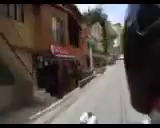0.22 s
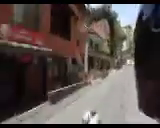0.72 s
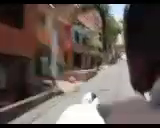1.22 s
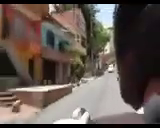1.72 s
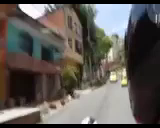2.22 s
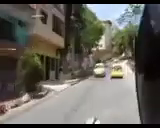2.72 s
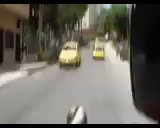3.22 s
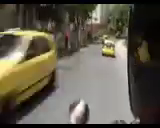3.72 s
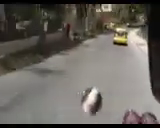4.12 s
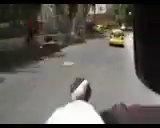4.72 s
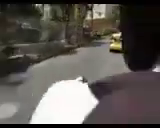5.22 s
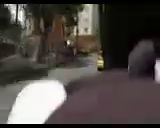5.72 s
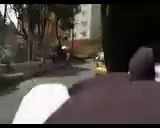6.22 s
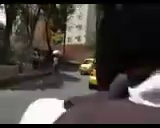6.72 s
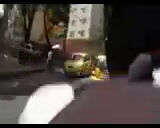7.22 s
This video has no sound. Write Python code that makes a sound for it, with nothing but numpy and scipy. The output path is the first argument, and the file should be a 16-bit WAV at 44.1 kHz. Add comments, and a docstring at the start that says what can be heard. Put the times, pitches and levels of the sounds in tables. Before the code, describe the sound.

Harsh wind buffeting distorts over a single-cylinder motorcycle ride; the gusts ease, the engine emerges, a sharp hiss bursts, and the revs drop.

```python
"""Small motorcycle in gusty wind

A small motorcycle rides down a street with a bare microphone behind the rider's helmet.
Gusts are shaped noise that thumps and crackles; short pushes and spikes overload the microphone.
Beneath them the single-cylinder engine booms in sine waves and clatters in ringing noise, and
slows at the end. Partway through the slowing comes one sharp burst of hiss."""
import sys
import numpy as np
from scipy import signal
from scipy.fft import rfft, irfft
from scipy.io import wavfile
from scipy.ndimage import uniform_filter1d

SR = 44100
rng = np.random.default_rng(int(sys.argv[2]) if len(sys.argv) > 2 else 0)


def to_wav(s):
    """Save 16-bit WAV."""
    ch = np.atleast_2d(s).T  # columns
    pcm = np.round(np.clip(ch, -1, 1) * 32767)  # PCM
    wavfile.write(sys.argv[1], SR, pcm.astype(np.int16))


N = 328104  # length in samples

# Strength of the gusts. Each row: start in seconds, length in seconds, strength in dB,
# change of strength by the end in dB, crackle compared with the strength in dB.
GUSTS = [(0.0, 0.24, -14.5, -8.5, -18), (0.248, 0.2, -15, -5, -23), (0.537, 0.096, -13.5, -14, -12.5),
         (0.681, 0.2, -15, -1.5, -18), (0.97, 0.13, -30, 9.5, -18), (1.133, 0.096, -12, -4, -11),
         (1.271, 0.25, -16.5, -4.5, -17), (1.404, 0.16, -19.5, 3.5, -2), (1.569, 0.071, -16.5, -8, -15),
         (1.666, 0.07, -19.5, -4.5, -12), (1.751, 0.21, -19, 2.5, -6), (2.093, 0.098, -22.5, 8, -14.5),
         (2.226, 0.2, -19, 3.5, -4.5), (2.424, 0.16, -20.5, -0.5, -12), (2.689, 0.22, -21, 1, -7.5),
         (2.906, 0.13, -25.5, 2, -37), (3.165, 0.13, -17.5, 3.5, -7), (3.3, 0.098, -19, 0, -10.5),
         (3.524, 0.4, -19, -9.5, -17), (3.983, 0.14, -18, 3, -13.5), (4.138, 0.12, -15.5, -6, -9),
         (4.267, 0.085, -26, -1, -15), (4.385, 0.1, -19, -1, -12), (4.495, 0.058, -18.5, 2, -13),
         (4.737, 0.17, -30.5, 11, -4.5), (4.931, 0.21, -18.5, -1, -10), (5.162, 0.13, -16.5, -3, -9),
         (5.316, 0.14, -20.5, -5.5, -16), (5.55, 0.094, -27.5, -12, -8), (5.656, 0.035, -24, 11, -15),
         (6.84, 0.063, -22.5, -7, -22), (6.917, 0.05, -27, 6, -24), (7.01, 0.03, -27, 2, -22),
         (7.099, 0.028, -17.5, 6, -9.5), (7.155, 0.044, -22, -9, -25)]
# Air stream between the gusts. Each row: time in seconds, strength in dB.
LULL = [(0, -26.5), (2, -28.5), (3.5, -31), (4.5, -29.5), (5.5, -39), (6.7, -28), (7.44, -36)]
# Depth of the rumble compared with the gusts. Each row: time in seconds, level in dB.
RUMBLE_DEPTH = [(0, -4), (0.8, -7.5), (2, -11.5), (3, -5), (4, -5), (4.7, -10.5), (5.6, 0), (6.3, -10),
                (7.44, 0)]
# Tone colours of the deep rumble, the wind's thump and its crackle (only the balance counts).
# Each row: frequency in Hz, strength in dB per Hz.
RUMBLE_COLOUR = [(20, -33.5), (40, -5), (70, -8), (110, -5), (180, -7), (400, -65)]
THUMP_COLOUR = [(20, -15), (45, -16), (90, -3), (200, -2), (400, -5), (800, -14), (1600, -24),
                (6000, -50.5)]
CRACKLE_COLOUR = [(200, -30.5), (600, 10.5), (1000, 5.5), (2000, -2.5), (3500, -6.5), (6000, -19)]

# Engine speed. Each row: time in seconds, firing rate in Hz.
REVS = [(0, 22), (2.8, 23), (3.85, 21.9), (4.7, 21.3), (5.75, 24.4), (6.05, 24.6), (6.3, 22.9), (6.6, 21.7),
        (6.75, 20.3), (6.95, 18.1), (7.15, 16.2), (7.44, 15.4)]
# Exhaust boom. Each row: time in seconds, level in dB, extra lift of the eighth order in dB.
BOOM = [(0, -34, -2), (1, -32.5, 1), (2.4, -48, -2), (2.8, -21, 8), (3.3, -32.5, 14.5), (3.85, -24, 7.5),
        (4.2, -25.5, 8), (4.7, -25.5, 13.5), (5.0, -25.5, 6.5), (5.4, -31, -2), (5.8, -27, 2.5),
        (6.0, -23, -11), (6.2, -21.5, -10), (6.45, -16.5, 5), (6.67, -17, -0.5), (6.76, -27, 12),
        (7.0, -26, 8), (7.44, -30.5, 8)]
# Exhaust orders, the sine waves of the boom. Each row: multiple of the firing rate,
# level compared with the boom in dB.
EXHAUST_ORDERS = list(zip(range(2, 9), (-25.5, -14.5, -0.5, -9, -14.0, -17, -16)))
# Shared level of engine clatter and road roar. Each row: time in seconds, level in dB.
ROAR = [(0.0, -36.5), (0.37, -44.5), (1.3, -46.5), (1.93, -47.5), (2.38, -54), (2.76, -48), (3.15, -40),
        (3.67, -42), (4.0, -30), (4.21, -38.5), (4.89, -34.5), (5.3, -44), (5.9, -39.5), (6.55, -29.5),
        (6.65, -29.5), (7.11, -33), (7.44, -32.5)]
# Tone colour of the road roar (only the balance counts). Each row: frequency in Hz, strength in dB per Hz.
ROAD_COLOUR = [(30, -49.5), (70, -14), (130, -12.5), (220, -25.5), (320, -14.5), (500, -25), (650, -26),
               (800, -28.5), (1000, -25.5), (1400, -28.5), (2500, -30), (4000, -30), (5600, -36),
               (7000, -35.5)]
# Resonances of the engine casing. Each row: frequency in Hz, width in Hz, level in dB against each other.
CASING = [(315, 19, 5), (960, 130, 1), (2040, 300, 3), (3870, 100, -7.5), (4015, 40, -5), (4820, 66, -4.5)]

# Bright snaps where an eddy tears. Each row: time in seconds, peak of the noise in dB, pitch in Hz.
SNAPS = [(0.0718, -9.5, 1570), (0.1216, -15, 1530), (0.2703, -22, 1520), (0.3065, -23, 1850),
         (0.3232, -9, 1650), (0.4125, -23, 1880), (0.4663, -13, 1540), (0.5427, -15, 1870),
         (0.5851, -22, 1830), (0.6933, -21, 2350), (0.7901, -24, 1520), (0.837, -6.5, 2880),
         (0.9738, -22, 2090), (1.0231, -23, 2370), (1.1573, -0.5, 1550), (1.2002, -26, 1540),
         (1.3052, -12.5, 1490), (1.3224, -13, 2160), (1.3543, -30, 1650), (1.3763, -23, 1870),
         (1.4063, -15, 2330), (1.4242, -12.5, 1520), (1.4414, -12, 2430), (1.4616, -10, 1860),
         (1.479, -5, 1600), (1.5155, -10, 2690), (1.5314, -4.5, 1730), (1.576, -14, 1650),
         (1.6152, -19, 1970), (1.6712, -23, 1620), (1.6965, -14, 1520), (1.7559, -18, 1510),
         (1.7734, -11.5, 1530), (1.8033, -14, 1670), (1.8447, -9.5, 1550), (1.9011, -15, 1520),
         (1.9447, -10, 1530), (2.1026, -27, 1850), (2.1276, -18, 1520), (2.156, -18, 1810),
         (2.2273, -14, 1650), (2.264, -14, 1530), (2.3201, -8, 1530), (2.34, -17, 2120), (2.399, -13, 2100),
         (2.4577, -8, 1550), (2.4945, -16, 1620), (2.5142, -26, 2530), (2.5309, -15.5, 1660),
         (2.563, -17.5, 1540), (2.6305, -16, 1570), (2.7172, -8, 1510), (2.7741, -8, 1720),
         (2.8025, -11, 1610), (2.8225, -18, 2190), (2.8403, -13, 1540), (2.8878, -22, 1940),
         (2.995, -20, 1640), (3.0714, -31, 1840), (3.1393, -16, 1760), (3.1787, -18, 2270),
         (3.1983, -25, 1940), (3.2385, -7.5, 2320), (3.264, -3.5, 3380), (3.2904, -12, 1920),
         (3.3388, -18, 1880), (3.361, -15.5, 1680), (3.6132, -19, 1540), (3.6438, -20, 2260),
         (3.794, -15, 1530), (4.0657, -7, 1550), (4.1609, -9.5, 1550), (4.2178, -14, 2420),
         (4.3011, -13, 1510), (4.5161, -10, 1600), (4.5416, -15, 1610), (4.8434, -12.5, 1880),
         (4.8878, -12, 1740), (5.0431, -13, 1570), (5.1916, -8, 1570), (5.2776, -19, 1680),
         (5.3198, -10, 2020), (5.3398, -20, 1670), (5.3595, -20, 1740), (5.4186, -18.5, 1590),
         (5.6865, -4, 1730)]
# The hardest jolts. Each row: time in seconds, pressure before the microphone squeezes it
# (negative is suction), width at half height in milliseconds.
JOLTS = [(0.0747, -0.81, 0.6), (0.1961, 1, 1.3), (0.27, -0.49, 0.59), (0.3242, -1.17, 0.76),
         (0.3632, -0.72, 1.4), (0.467, -0.61, 0.63), (0.544, -0.55, 0.53), (0.76, -0.51, 0.66),
         (0.9774, 0.42, 1.44), (1.1601, 0.55, 0.085), (1.1888, -0.48, 1.0), (1.3091, -0.53, 0.69),
         (1.444, -0.19, 0.25), (1.481, -0.69, 0.39), (1.5163, -0.49, 0.53), (1.536, -0.82, 0.39),
         (1.8077, -0.88, 0.39), (1.8585, -0.91, 0.44), (2.1575, -0.57, 0.44), (2.3228, -0.47, 0.42),
         (2.3622, -0.28, 0.93), (2.3758, -0.38, 0.85), (2.3982, -0.47, 0.46), (2.728, -0.63, 0.53),
         (2.7757, -0.17, 0.073), (2.7929, 1, 0.52), (3.1989, -0.52, 0.84), (3.2704, 0.89, 0.38),
         (3.3101, -0.37, 0.23), (3.3405, -0.4, 0.42), (4.01, -0.98, 0.77), (4.038, -0.16, 0.37),
         (4.0671, -0.57, 0.43), (4.1632, 0.69, 0.62), (4.1782, 0.49, 0.35), (4.3082, 0.88, 0.55),
         (4.5158, -0.52, 1), (4.5424, -0.74, 0.52), (4.8889, -1.1, 0.57), (4.9025, 0.77, 0.82),
         (4.9876, 0.75, 0.7), (5.0003, 0.82, 1.26), (5.1985, -0.94, 0.34), (5.21, 0.87, 0.57),
         (5.2813, -0.73, 0.38), (5.295, 0.55, 0.75), (5.3214, 1, 0.84), (5.6845, 0.96, 0.7),
         (5.7015, 0.84, 0.59), (6.9421, 0.39, 1.55), (7.1156, 0.67, 1.56), (7.1681, -0.81, 2.2)]
# The hardest eddies. Each row: start in seconds, level in dB, middle pitch in Hz,
# crackle compared with the level in dB.
SLAPS = [(0.165, -8.5, 132, -24), (0.264, -11.5, 227, -25), (0.316, -6, 182, -20), (0.406, -23, 114, -28),
         (0.459, -9.5, 224, -14.5), (0.534, -9.5, 165, -21), (0.724, -8, 168, -28), (0.969, -8, 158, -24),
         (1.014, -8, 119, -28), (1.149, -6, 714, -30), (1.3, -12, 268, -24), (1.763, -10, 160, -19.5),
         (1.801, -8.5, 261, -28), (2.095, -14, 236, -34), (2.219, -13, 145, -20.5), (2.49, -13, 414, -37),
         (2.627, -9, 283, -9.5), (2.711, -9.5, 228, -24), (2.996, -7, 181, -34), (3.065, -13.5, 215, -7.5),
         (3.134, -12.5, 233, -24), (3.189, -6.5, 138, -33), (3.463, -12, 121, -34), (3.517, -12, 127, -33),
         (3.689, -12, 267, -24), (3.723, -12.5, 173, -19), (3.985, -9.5, 107, -35), (4.3, -9.5, 180, -19),
         (4.413, -9, 270, -21), (4.511, -10, 196, -31), (4.615, -15, 164, -24), (4.723, -18.5, 116, -17),
         (4.759, -17, 156, -26), (4.824, -11, 148, -26), (4.884, -1.5, 286, -22), (5.193, 0.5, 117, -8),
         (5.277, -6, 409, -27), (5.407, -11.5, 79.5, -26), (5.495, -23, 108, -24), (5.575, -15, 243, -31),
         (5.678, -0.5, 177, -33), (6.836, -9.5, 182, -27), (6.935, -10.5, 222, -28), (7.003, -14, 107, -27),
         (7.109, -3.5, 143, -26), (7.162, -4.5, 140.6, -30)]
# The burst of hiss. Its one row: level in dB, rise in seconds (time constant),
# time to fall by 60 dB in seconds, brightest frequency in Hz.
BURST = [(-10.5, 0.011, 0.013, 2090)]

GUST_RISE_S, GUST_FALL_S = 0.015, 0.02
LULL_CRACKLE_DB = -6.5  # against the lull's strength
TICK_S = 7.158  # a moment at which the valve ticks
ORDER_SWAY_RAD = 0.3  # phase sway of the exhaust orders
TICK_DB = -7  # valve tick against the roar, at a firing rate of 16 Hz
TICK_DB_PER_HZ = -0.7  # the tick sinks into the roar as the firing rate climbs
SNAP_T60_S = 0.013  # time to fall by 60 dB
SNAP_PUSH_DB = -12.5  # the dull push under every snap
SLAP_T60_S = 0.031  # time of the 60 dB fall
BURST_S = 6.6735  # moment of the burst's peak
MIC_HZ, EDGE_HZ = 5735, 15870  # upper limits of the camera's band and of the outer band
FULL_SCALE = 0.71  # height at which the wave is clipped


def gain_of(db):
    """Turns dB into a plain multiplier."""
    return 10 ** (np.asarray(db) / 20)


def evened(x):
    """Brings a signal to an average (rms) level of 1."""
    return x / np.sqrt(np.mean(x ** 2) + 1e-20)


def curves(rows):
    """Draws straight lines between the rows of a table, one curve for each column after the time."""
    s, *columns = np.transpose(rows)
    return [np.interp(np.arange(N) / SR, s, c) for c in columns]


def coloured(x, points):
    """Filters a signal with the tone colour of a table, then brings it to rms 1."""
    f, db = np.transpose(points)
    hz = np.fft.rfftfreq(len(x), 1 / SR)
    colour_db = np.interp(np.log(hz + 1), np.log(f + 1), db)
    return evened(irfft(rfft(x) * gain_of(colour_db), len(x)))


def wander(low_hz, high_hz):
    """Random swaying between two rates, slower parts larger, at rms 1."""
    hz = np.fft.rfftfreq(N, 1 / SR) + .01
    shape = 1 / np.sqrt(hz) / (1 + (hz / high_hz) ** 2) / (1 + (low_hz / hz) ** 2)
    return evened(irfft(rfft(rng.standard_normal(N)) * shape, N))


def resonate(x, hz, width):
    """One fixed resonance that leaves its own frequency at gain 1 and weakens the rest."""
    return signal.lfilter(*signal.iirpeak(hz, hz / width, SR), x)


def ricker(u):
    """One spike with a rebound on either side."""
    return (1 - u ** 2) * np.exp(-u ** 2 / 2)


def add(mix, s, sound):
    """Mixes a short sound in at a time in seconds."""
    part = mix[round(s * SR):][:len(sound)]
    part += sound[:len(part)]


def gusts():
    """Each gust rises fast, drifts in strength and drops back to the lull; gives strength and crackle in dB."""
    t = np.arange(N) / SR
    power = gain_of(2 * curves(LULL)[0])
    weighted_crackle = power * LULL_CRACKLE_DB
    for s, length, db, change_db, crackle_db in GUSTS:
        rise = (t - s) / GUST_RISE_S
        fall = 1 + (s + length - t) / GUST_FALL_S
        gate = np.clip(np.minimum(rise, fall), 0, 1) ** 2
        drift_db = change_db * np.clip((t - s) / length, 0, 1)
        gust = gate * gain_of(2 * (db + drift_db))
        power = power + gust
        weighted_crackle = weighted_crackle + gust * crackle_db
    return 10 * np.log10(power), weighted_crackle / power


def wind():
    """Eddies pass the capsule in lumps; short flaps jolt it and carry the crackle; the rumble is smoother."""
    strength_db, crackle_db = gusts()
    eddies = 2.13 * np.tanh(wander(low_hz=4.8, high_hz=87.5) / 2.3)  # lumps grow only so far

    # about 170 flaps a second, of random size
    sizes = gain_of(5.66 * np.minimum(rng.exponential(1, N), 2.5)) * (rng.random(N) < 170 / SR)
    flaps = 1.0 + signal.oaconvolve(sizes, signal.windows.hann(220), "same")
    signs = np.where(rng.random(N) < .7, -1, 1)  # mostly suction
    spike = ricker(np.arange(-200, 200) / SR * 1150)
    jolts = signal.oaconvolve(sizes * signs, spike, "same")

    rumble = coloured(rng.standard_normal(N), RUMBLE_COLOUR) * gain_of(2.0 * eddies)
    thump = coloured(rng.standard_normal(N), THUMP_COLOUR) * flaps ** .5
    thump = evened(thump + 0.49 * evened(jolts))
    crackle = coloured(rng.standard_normal(N), CRACKLE_COLOUR) * flaps
    fizz = resonate(rng.standard_normal(N), 3100, 2000) * flaps ** 1.2
    fizz_db = 1.61 * crackle_db - 14.0  # harder tearing is brighter
    tearing = gain_of(crackle_db) * evened(crackle) + gain_of(fizz_db) * evened(fizz)

    slow_strength = np.sqrt(uniform_filter1d(gain_of(2 * strength_db), 4000))
    deep = gain_of(curves(RUMBLE_DEPTH)[0]) * slow_strength * rumble
    return gain_of(strength_db + 2.77 * eddies) * (thump + tearing) + deep


def engine():
    """Low orders boom from the exhaust; each firing puffs noise through the casing and a valve ticks."""
    firing_hz = curves(REVS)[0]
    firings = np.cumsum(firing_hz) / SR  # running count of firings
    firings -= firings[round(TICK_S * SR)]

    boom_db, lift_db = curves(BOOM)
    boom = np.zeros(N)
    for k, db in EXHAUST_ORDERS:
        order_db = db + (k == 8) * lift_db + 2.0 * wander(low_hz=1.5, high_hz=16)
        sway = ORDER_SWAY_RAD * wander(low_hz=1.6, high_hz=3.8)
        boom += gain_of(order_db) * np.sin(2 * np.pi * k * firings + sway)

    # times within a firing are counted in parts of one firing
    puffs = (1 + 0.56 * np.exp(-((firings - .4) % 1) / 0.71)) * rng.standard_normal(N)
    ring = sum(gain_of(db) * evened(resonate(puffs, hz, width)) for hz, width, db in CASING)
    ticks = resonate(np.exp(-(firings % 1) / 0.057) * rng.standard_normal(N), 3780, 610)
    tick_db = TICK_DB + TICK_DB_PER_HZ * (firing_hz - 16)
    road = coloured(rng.standard_normal(N), ROAD_COLOUR) * gain_of(1.58 * wander(low_hz=1.0, high_hz=40))
    roar = gain_of(-7) * ring + gain_of(8) * road + gain_of(tick_db) * evened(ticks)
    return gain_of(boom_db) * boom + gain_of(curves(ROAR)[0]) * roar


def snaps():
    """A few milliseconds of bright noise around one pitch, riding on one quick push."""
    out, t = np.zeros(N), np.arange(2048) / SR
    onset = 1 - np.exp(-t / 0.000097)
    fade = gain_of(-60 * np.maximum(t - .0025, 0) / SNAP_T60_S)  # holds for 2.5 ms first
    push = np.sin(2 * np.pi * 330 * t) * np.exp(-t / 0.0013)
    for s, peak_db, hz in SNAPS:
        noise = rng.standard_normal(len(t))
        sign = np.sign(rng.random() - .7)  # mostly suction
        bright = evened(resonate(noise, hz, 0.36 * hz)) + coloured(noise, CRACKLE_COLOUR)
        snap = bright * onset * fade
        add(out, s, gain_of(peak_db) * snap / abs(snap).max() + sign * gain_of(SNAP_PUSH_DB) * push)
    return out


def hard_jolts():
    """One narrow spike of pressure or suction with a rebound on either side."""
    out, t_ms = np.zeros(N), np.arange(-400, 400) / SR * 1000
    for s, pressure, width_ms in JOLTS:
        add(out, s - 400 / SR, pressure * ricker(t_ms / width_ms * 1.2))  # spike centred on s
    return out


def slaps():
    """Each hard eddy pushes the diaphragm for a few cycles and tears into a short crackle at its height."""
    out, t = np.zeros(N), np.arange(4096) / SR
    shape = (1 - np.exp(-t / 0.0059)) ** 2 * gain_of(-60 * t / SLAP_T60_S)
    shape /= shape.max()
    for s, level_db, hz, crackle_db in SLAPS:
        low, high = rng.standard_normal((2, len(t)))
        swaying_hz = hz * (1 + .35 * evened(uniform_filter1d(low, 150)))
        push = np.sin(2 * np.pi * np.cumsum(swaying_hz) / SR)
        crackle = gain_of(crackle_db) * coloured(high, CRACKLE_COLOUR) * shape
        body = push + 0.48 * coloured(low, THUMP_COLOUR) + crackle
        add(out, s, gain_of(level_db) * body * shape)
    return out


def burst():
    """Hiss from three resonances swells to a sharp peak, drops much faster and leaves a weaker, slower tail."""
    level_db, rise, t60, hz = BURST[0]
    t, noise = np.arange(N) / SR - BURST_S, rng.standard_normal(N)
    before, after = np.minimum(t, 0), np.maximum(t, 0)
    swell = np.exp(before / rise)
    fall = gain_of(-60 * after / t60) + 0.41 * np.exp(-after / 0.042)
    shape = np.where(t < 0, swell, fall)
    middle = evened(resonate(noise, hz, 440))
    high = 1.14 * evened(resonate(noise, 3600, 2000))
    low = 1.0 * evened(resonate(noise, 1100, 500))
    return gain_of(level_db) * shape * evened(middle + high + low)


def scene():
    """Adds all the sounds together as one channel."""
    return (wind() + engine() + snaps() + hard_jolts() + slaps() + burst())[None]


def record(dry):
    """A capsule that saturates and loses the deepest bass, the camera's narrow band, clipping, outer band."""
    saturated = 1.432 * np.tanh(dry / 1.61)
    squeezed = signal.lfilter(*signal.butter(1, 30, "high", fs=SR), saturated)
    mic_filter = signal.firwin(1023, MIC_HZ, window=("kaiser", 9), fs=SR)[None]
    narrow = signal.oaconvolve(squeezed, mic_filter, "same")
    clipped = np.clip(narrow, -FULL_SCALE, FULL_SCALE)
    edge_filter = signal.firwin(511, EDGE_HZ, window=("kaiser", 9), fs=SR)[None]
    return signal.oaconvolve(clipped, edge_filter, "same")


dry = scene()
out = record(dry)
to_wav(out)
```